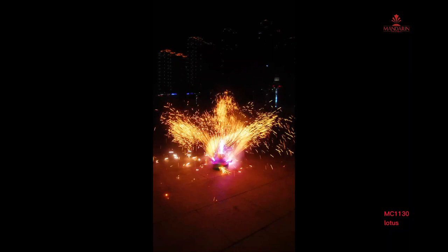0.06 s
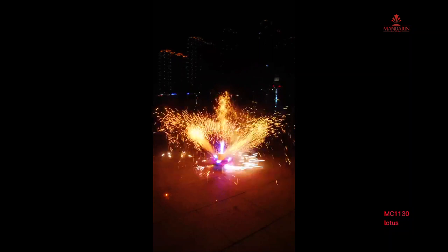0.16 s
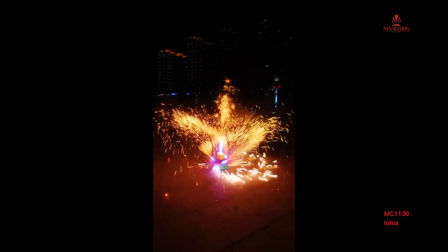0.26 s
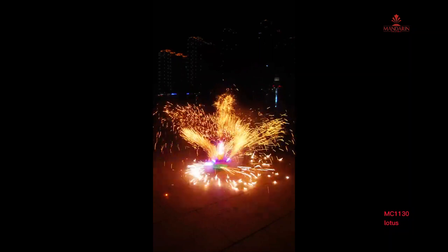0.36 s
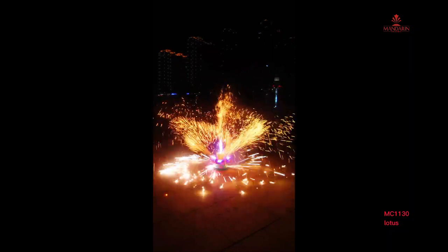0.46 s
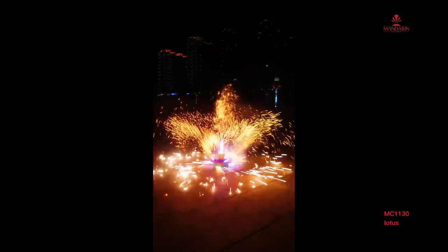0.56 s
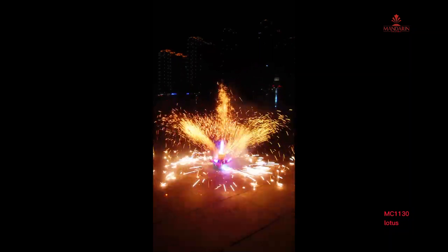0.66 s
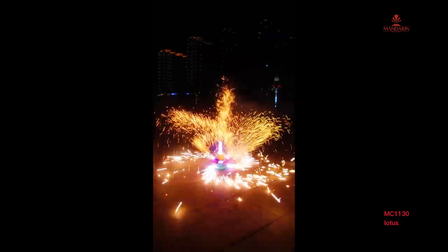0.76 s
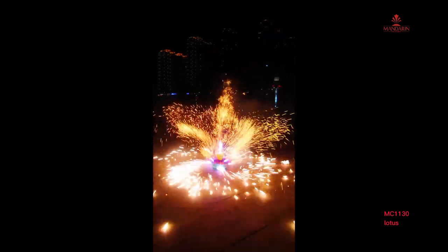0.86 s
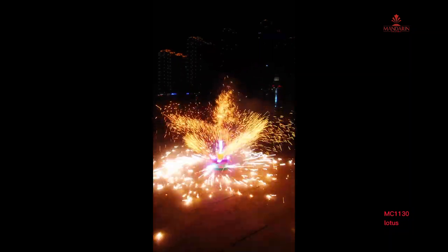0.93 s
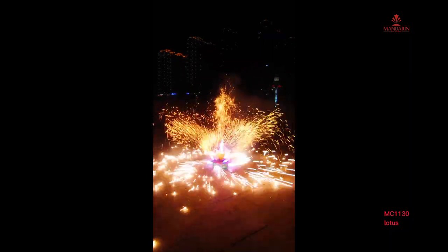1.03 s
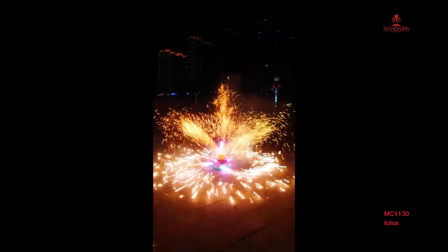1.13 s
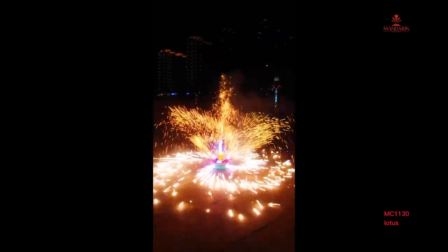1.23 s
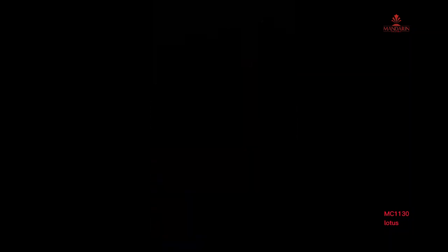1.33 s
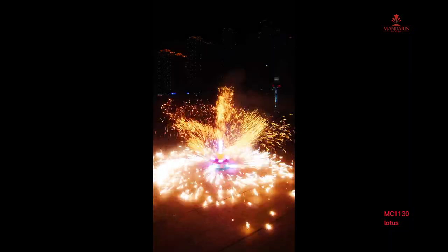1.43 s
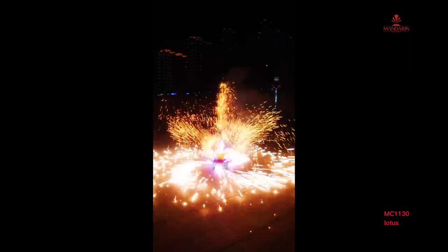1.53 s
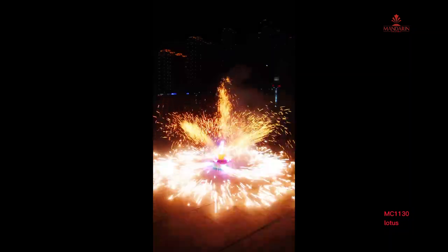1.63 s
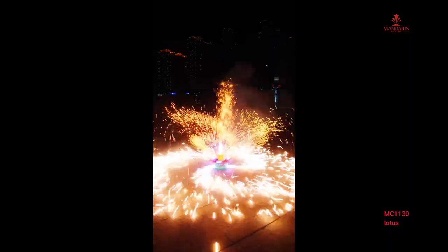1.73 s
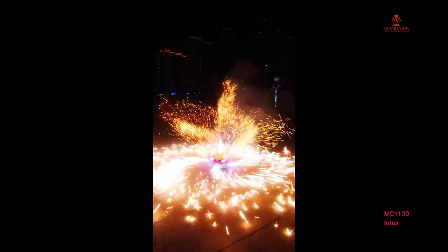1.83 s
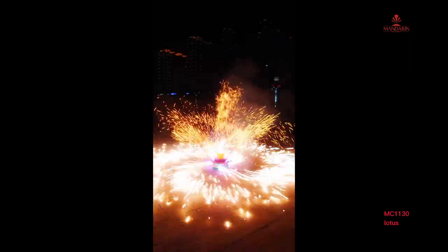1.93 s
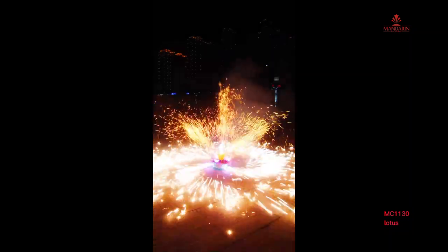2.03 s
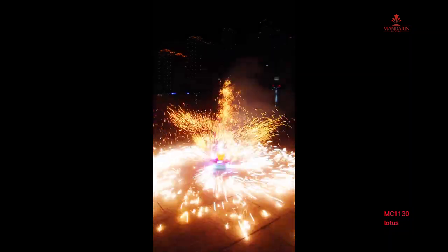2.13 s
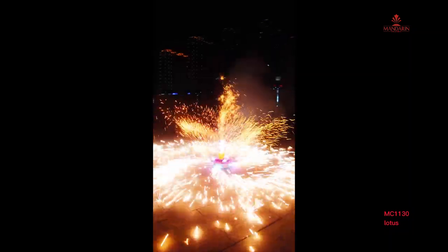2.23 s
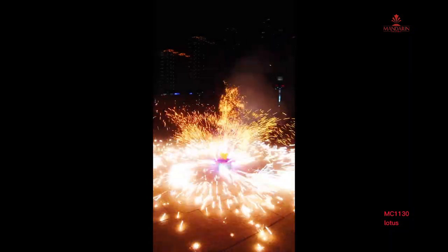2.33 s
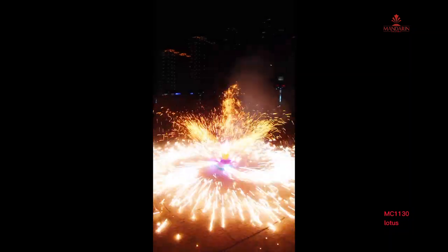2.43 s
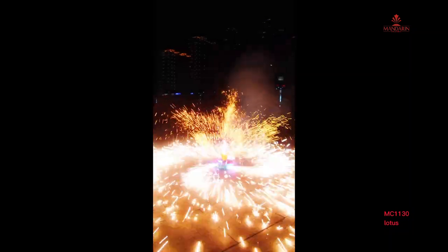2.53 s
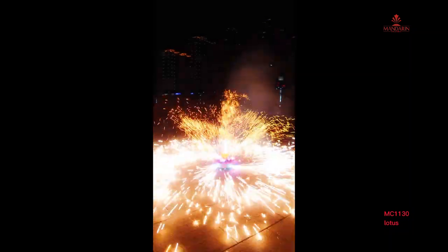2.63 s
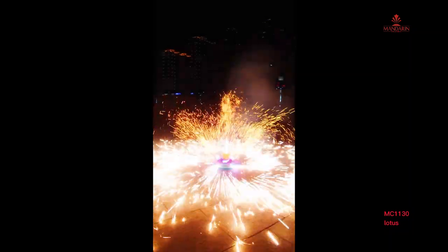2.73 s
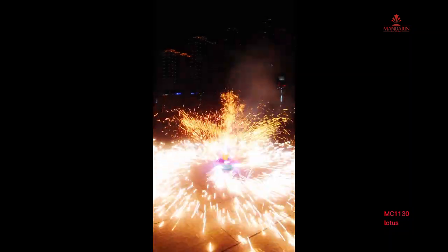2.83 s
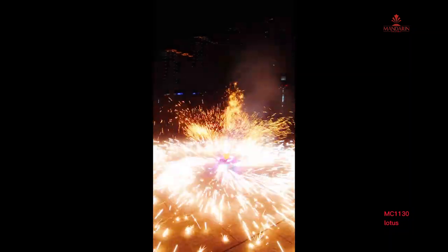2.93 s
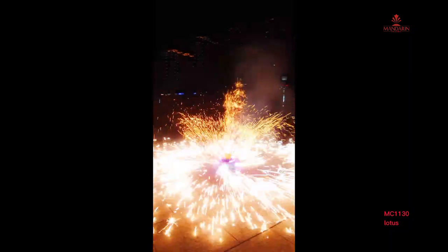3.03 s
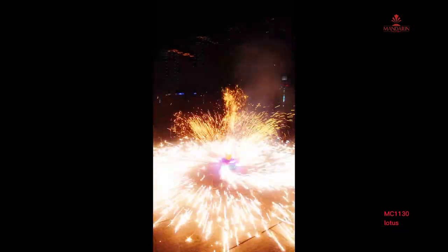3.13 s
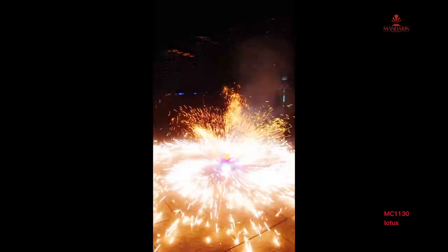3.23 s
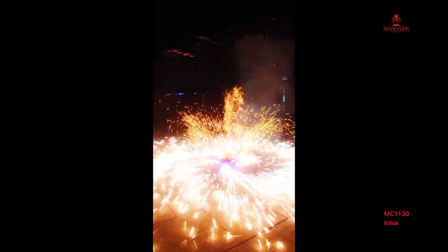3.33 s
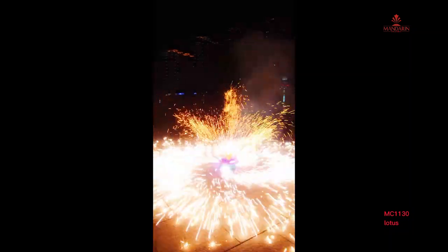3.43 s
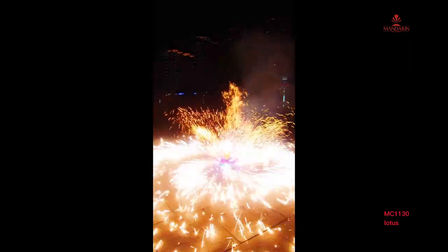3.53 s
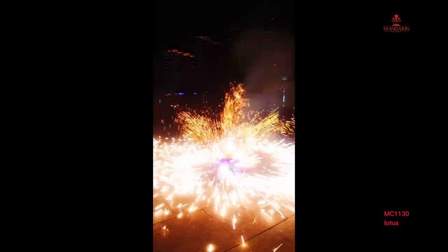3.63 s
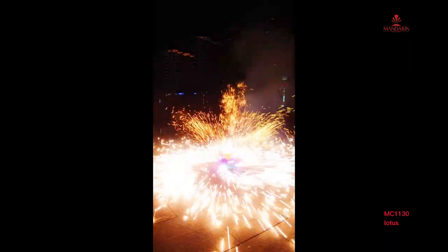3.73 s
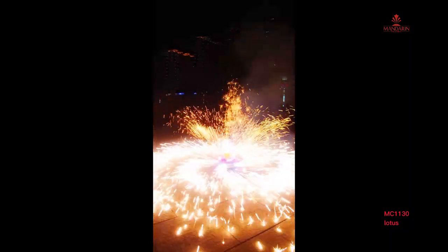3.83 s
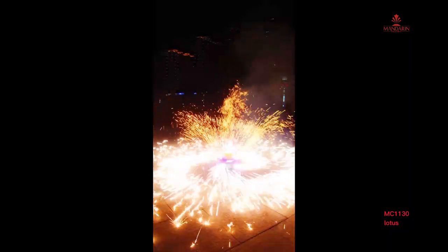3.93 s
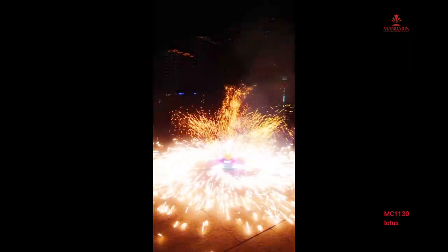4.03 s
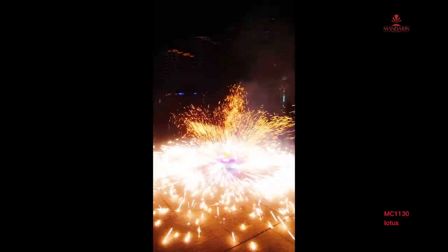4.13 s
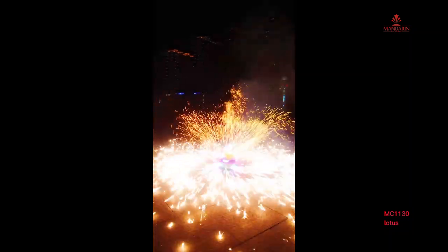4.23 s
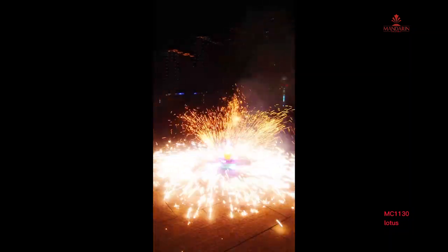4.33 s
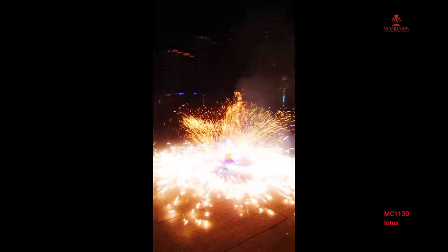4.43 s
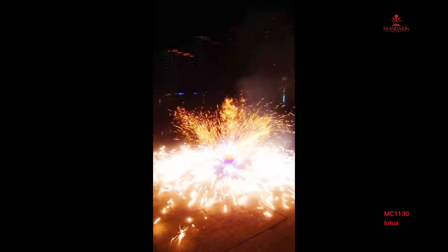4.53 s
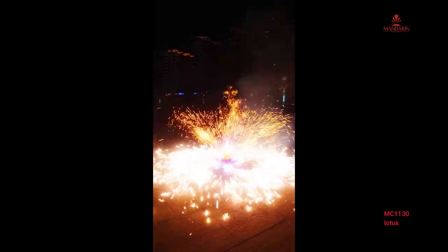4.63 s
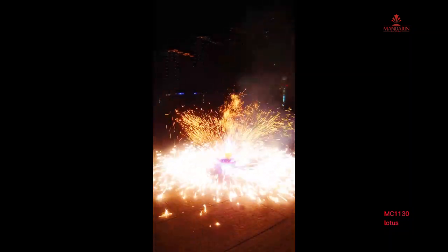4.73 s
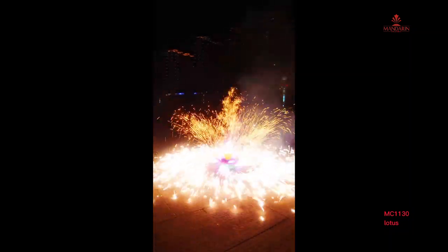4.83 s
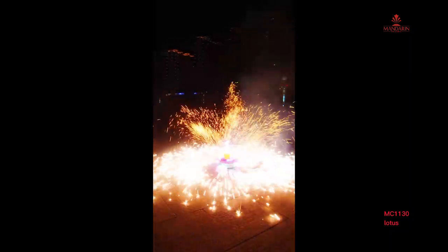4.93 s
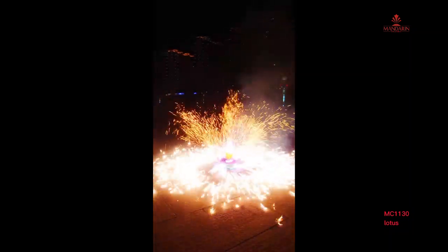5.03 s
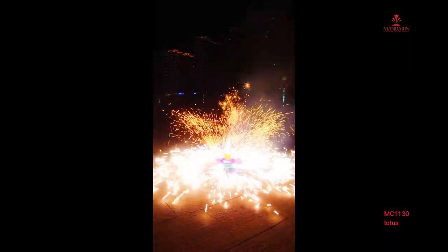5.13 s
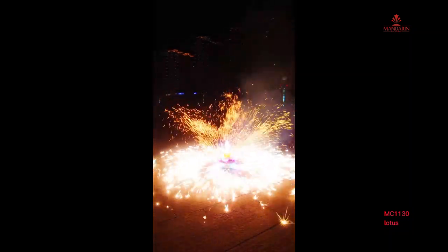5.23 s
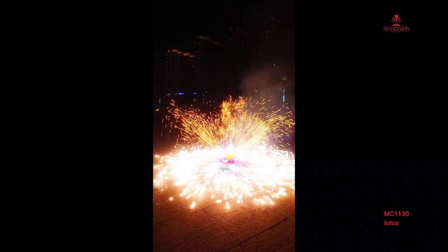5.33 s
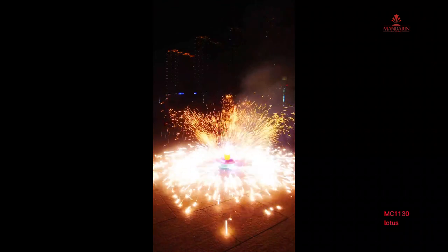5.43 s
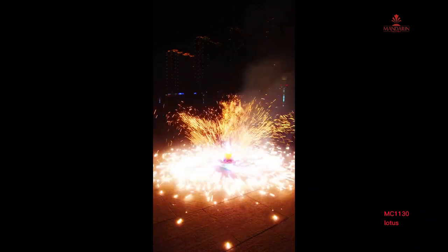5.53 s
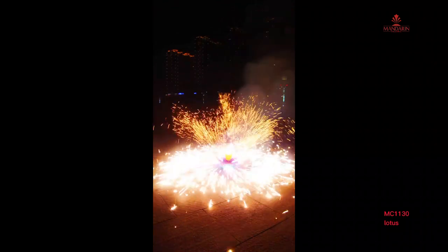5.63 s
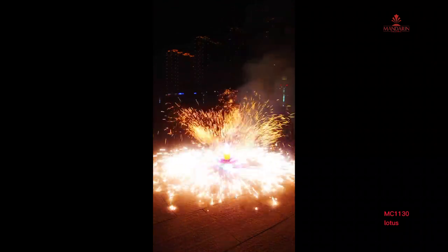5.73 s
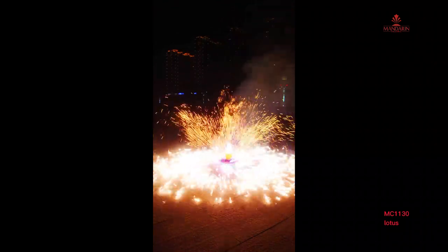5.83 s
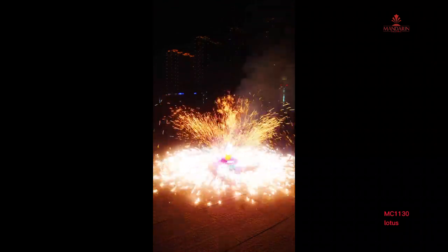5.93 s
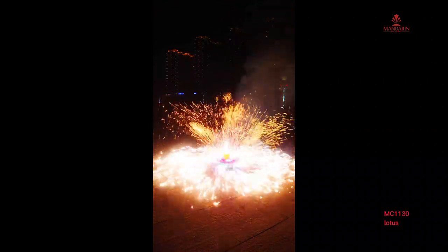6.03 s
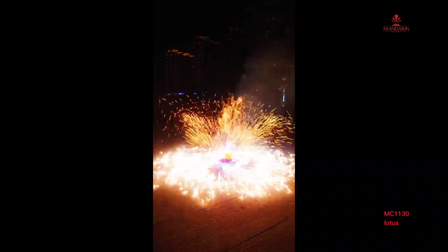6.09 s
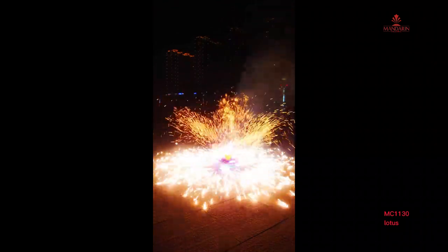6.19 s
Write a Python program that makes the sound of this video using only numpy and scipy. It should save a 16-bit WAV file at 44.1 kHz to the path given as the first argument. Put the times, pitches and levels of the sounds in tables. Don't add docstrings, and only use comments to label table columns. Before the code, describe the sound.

A spinning ground firework swells from faint hiss to full rushing roar outdoors at night, crackling and popping, with one momentary dropout.

```python
import sys
import numpy as np
from scipy import signal
from scipy.fft import rfft, irfft
from scipy.io import wavfile
from scipy.ndimage import uniform_filter1d

SR = 44100
rng = np.random.default_rng(int(sys.argv[2]) if len(sys.argv) > 2 else 0)


def attenuation_scalar(level_db):
    decades = np.asarray(level_db, float) / 20
    return 10 ** decades


def materialize(psi):
    bounded = np.clip(np.atleast_2d(psi).T, -1, 1)
    quanta = np.round(bounded * 32767).astype(np.int16)
    wavfile.write(sys.argv[1], SR, quanta)


N = 276066
TIME = np.arange(N) / SR
HZ = np.fft.rfftfreq(N, 1 / SR)


# (time [s], level [dB])
BURN = [(0, -47), (.4, -46.5), (.52, -44), (.75, -44), (1.0, -40), (1.17, -36), (1.3, -36), (1.67, -35.5),
        (1.85, -33.5), (2.35, -31.5), (2.9, -30.5), (3.5, -31), (3.9, -34), (4.4, -35), (4.8, -36.5),
        (5.3, -37), (5.95, -38.5), (6.26, -40)]
EDGES_HZ = (100, 330, 1050, 3450, 15600)
# (level at full burn [dB], slope [dB per dB of burn], flare gain [dB], spark ring gain [dB])
PARTS = [
    (-40, 0.49, 6.5, -1.85),
    (-29.5, 0.5754, 5, 0.17),
    (-30, 1, 0, 0),
    (-36.5, 0.67, -2, 2.5),
]
# (shared [dB], own [dB])
FLUTTER = [
    (0.74, 0),
    (-0.1, 1.3),
    (0.92, 0.7),
    (1, 0.98),
]


def jets():
    full_burn_db = -30
    burn_db = np.interp(TIME, *np.transpose(BURN)) - full_burn_db
    flare = swell(start_s=0.92, attack_s=0.085, decay_s=0.61)
    ring = swell(start_s=2.16, attack_s=0.41, decay_s=3.2)
    sparks = np.diff(crackle(per_s=500, scatter_db=8.5, tail_s=0.00047), prepend=0)
    gas = rng.standard_normal(N) + attenuation_scalar(-6.0) * unit(sparks)
    sputter = walk(21.93)
    out = np.zeros(N)
    for k, (full_db, slope, flare_db, ring_db) in enumerate(PARTS):
        shared_db, own_db = FLUTTER[k]
        flutter_db = shared_db * sputter + own_db * walk(25.01)
        part_db = full_db + slope * burn_db + flare_db * flare + ring_db * ring
        out += attenuation_scalar(part_db + flutter_db) * posed(gas, EDGES_HZ[k], EDGES_HZ[k + 1])
    return out


def crackle(per_s, scatter_db, tail_s):
    loudness_db = scatter_db * np.minimum(rng.exponential(size=N), 3.5)
    burst = (rng.random(N) < per_s / SR) * attenuation_scalar(loudness_db)
    tail = signal.lfilter([1], [1, -np.exp(-1 / (tail_s * SR))], burst)
    return unit(tail * rng.standard_normal(N))


# (time [s], peak [dB])
POPS = [(1.0525, -20), (1.1937, -22), (1.2171, -20), (1.247, -18), (1.279, -20), (2.0188, -27),
        (2.2034, -16), (2.296, -20), (2.4256, -32), (2.7412, -27), (2.793, -28), (2.809, -26),
        (3.1088, -21), (3.1836, -16), (3.5194, -13), (3.658, -11), (3.7434, -22), (4.238, -17),
        (4.3154, -27), (4.38, -26), (4.4144, -15), (4.4726, -23), (4.5755, -26), (4.612, -29),
        (4.6952, -20), (4.822, -24), (5.3672, -22), (5.589, -16), (6.0593, -19.5), (6.142, -21)]


def pops():
    faint_count, faint_db, spread_db = 16, -38, 8
    when, size = rng.random((faint_count, 2)).T
    faint = list(zip(when * N / SR, faint_db + spread_db * (2 * size - 1)))
    flashes = np.diff(bursts(POPS + faint, decay_s=0.0015), prepend=0)
    return attenuation_scalar(-53) * posed(flashes, 2500, EDGES_HZ[-1])


# (time [s], peak [dB])
PUFFS = [(0.461, -24), (0.477, -28), (0.489, -19.5), (0.9, -21), (0.916, -21.5), (0.97, -20.5),
         (0.991, -29), (1.994, -15.5), (2.005, -12.5), (2.028, -15), (4.294, -30), (4.313, -21)]


def puffs():
    return attenuation_scalar(-45.5) * posed(bursts(PUFFS, decay_s=0.0041), 90, 1100)


# (time [s], pitch [Hz], level [dB])
SPIN = [
    (1.41, 495, -44),
    (1.5, 520, -39),
    (1.62, 590, -37),
    (1.85, 650, -37),
    (2.05, 675, -38),
    (2.25, 725, -35),
    (2.32, 748, -40),
    (2.4, 770, -58),
]


def wheel_hum():
    return tone(SPIN)


# (time [s], pitch [Hz], level [dB])
WHISTLE = [
    (2.38, 1550, -58),
    (2.42, 1560, -39),
    (2.54, 1552, -38),
    (2.68, 1497, -38),
    (2.8, 1440, -39),
    (2.85, 1425, -58),
]


def rocket_whistle():
    return tone(WHISTLE)


# (frequency [Hz], density [dB per Hz])
NIGHT = [(12, -38), (20, -27), (43, -7), (76, -5), (140, -7), (160, -1), (210, -31), (350, -120)]


def night():
    spectrum = rfft(rng.standard_normal(N)) * attenuation_scalar(shape_db(NIGHT, HZ)) * (HZ < 100)
    return attenuation_scalar(-53 + walk(2.85)) * unit(irfft(spectrum, N))


# (frequency [Hz], density [dB per Hz])
JET = [(60.0, -22.6), (240.0, -9.4), (460.0, -8.8), (680.0, 0.4), (1390.0, -12.6), (2330.0, -8.2),
       (2890.0, -17.1), (4150.0, -33.4), (6090.0, -21.1), (7110.0, -26.2), (11250.0, -25.0),
       (12500.0, -30.6), (14370.0, -19.9), (15370.0, -18.8)]
# (frequency [Hz], width [Hz], depth phone level [dB], depth phone tilted [dB])
NOTCHES = [(330, 80, -6, -6), (1030, 290, -18, -14), (1280, 100, -4, -4), (2080, 150, -1, -4),
           (2660, 150, -4, -3), (3420, 380, -17, -17), (3960, 220, -4, -7), (4570, 300, -10, -12),
           (4860, 300, -15, -15), (5170, 400, -27, -27), (6750, 900, -13, -7), (6980, 250, -2, -13),
           (8130, 360, -11, -2), (8550, 640, -10, -7), (9560, 570, -6, -7), (10610, 260, -3, -3),
           (11700, 870, 0, -5), (13610, 560, -4, -3)]


def heard(x, pose):
    hz = np.linspace(0, SR / 2, 2049)
    db = shape_db(JET, hz)
    for f, width, *depth_db in NOTCHES:
        db = db + depth_db[pose] * np.exp(-(2 * (hz - f) / width) ** 2)
    return causal(x, db)


def posed(x, lo_hz, hi_hz):
    start_s, end_s = 3.1, 3.94
    tilt = np.clip((TIME - start_s) / (end_s - start_s), 0, 1)
    level, tilted = (unit(band(heard(x, pose), lo_hz, hi_hz)) for pose in range(2))
    return level + tilt * (tilted - level)


def bursts(table, decay_s):
    size = 2048
    out = np.zeros(N + size)
    envelope = np.exp(-np.arange(size) / SR / decay_s)
    for (s, db), noise in zip(table, rng.standard_normal((len(table), size))):
        start = int(s * SR)
        out[start:start + size] += attenuation_scalar(db) * noise * envelope
    return out[:N]


def tone(table):
    s, hz, db = np.transpose(table)
    pitch_hz = np.interp(TIME, s, hz) * (1 + 0.003 * walk(30))
    phase = 2 * np.pi * np.cumsum(pitch_hz) / SR
    level_db = np.interp(TIME, s, db, left=-120, right=-120) + walk(20)
    return attenuation_scalar(level_db) * np.sqrt(2) * np.sin(phase)


def swell(start_s, attack_s, decay_s):
    late = np.maximum(TIME - start_s, 0)
    return np.minimum(late / attack_s, 1) * np.exp(-np.maximum(late - attack_s, 0) / decay_s)


def walk(rate):
    k = int(SR / rate)
    held = np.repeat(rng.standard_normal(N // k + 1), k)
    return 1.13 * uniform_filter1d(uniform_filter1d(held, k), k)[:N]


def unit(x):
    return x / np.sqrt(np.mean(x ** 2))


def shape_db(table, hz):
    f, db = np.transpose(table)
    return np.interp(np.log(hz + 1), np.log(f), db)


def causal(x, db):
    cep = irfft(db * np.log(10) / 20)
    half = len(cep) // 2
    cep[1:half] *= 2
    cep[half + 1:] = 0
    response = irfft(np.exp(rfft(cep)))[:half]
    return signal.fftconvolve(x, response)[:N]


def band(x, lo_hz, hi_hz):
    return irfft(rfft(x) * (HZ >= lo_hz) * (HZ < hi_hz), N)


def scene():
    mix = jets() + pops() + puffs() + wheel_hum() + rocket_whistle() + night()
    return mix[None]


# (frequency [Hz], level re mean hiss [dB])
LOSS_BAR = [(2800, -40), (3200, -11), (4200, -11), (4900, -17), (5400, -13), (7000, -8.5), (9000, -8.5),
            (12000, -6.5), (14000, -7)]


def thinned(x):
    f, _, z = signal.stft(x, SR, nperseg=2048)
    size = np.abs(z)
    near = uniform_filter1d(uniform_filter1d(size, size=3, axis=0), size=2, axis=1)
    hiss = uniform_filter1d(size[(f > 5400) & (f < 14800)].mean(axis=0), size=5)
    chance = uniform_filter1d(rng.standard_normal((len(f) // 16 + 1, z.shape[1])), size=3, axis=1)
    scatter_db = 5 * np.repeat(chance, 16, axis=0)[:len(f)]
    bar_db = np.interp(f, *np.transpose(LOSS_BAR))[:, None] + scatter_db
    gain = np.where(near > hiss * attenuation_scalar(bar_db), 1, attenuation_scalar(-40))
    return signal.istft(z * gain, SR, nperseg=2048)[1][:N]


def low_pass(x):
    return signal.sosfilt(signal.butter(12, 16640, fs=SR, output="sos"), x)


def record(dry):
    x = thinned(dry[0])[None]
    top_hz = 15270
    x = signal.sosfilt(signal.ellip(10, 0.2, 38, top_hz, fs=SR, output="sos"), x)
    gone_s, back_s = 1.3308, 1.4105
    gone = (TIME > gone_s) & (TIME < back_s)
    tail = attenuation_scalar(-42) * np.exp(-np.abs(TIME - gone_s) / 0.003)
    x = x * np.where(gone, tail, 1)
    return low_pass(x)


dry = scene()
out = record(dry)
materialize(out)
```